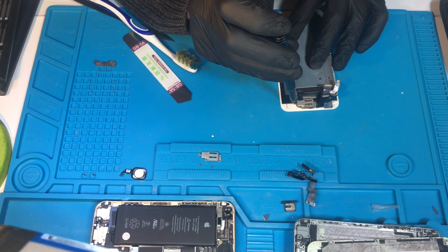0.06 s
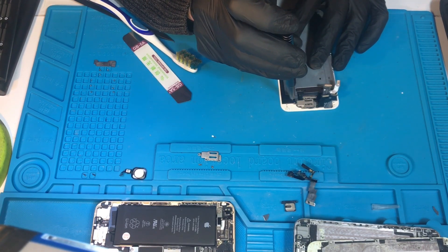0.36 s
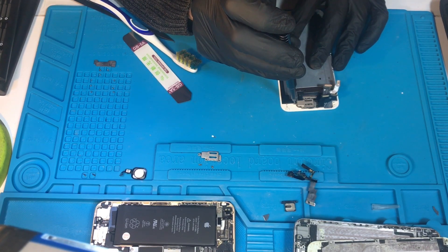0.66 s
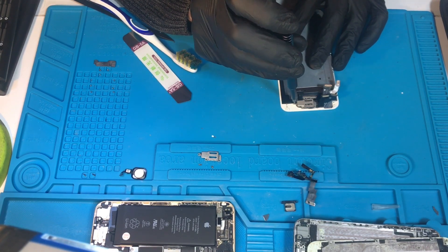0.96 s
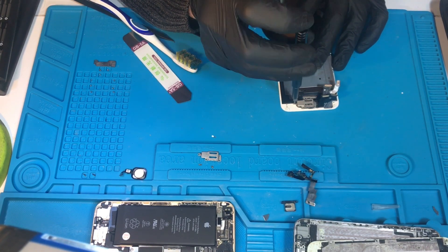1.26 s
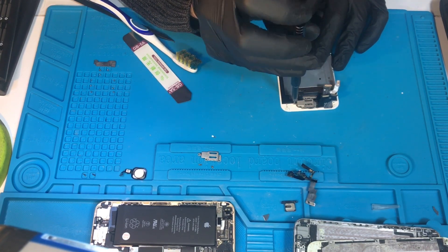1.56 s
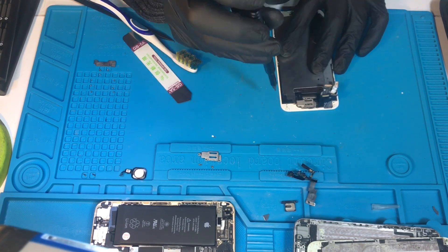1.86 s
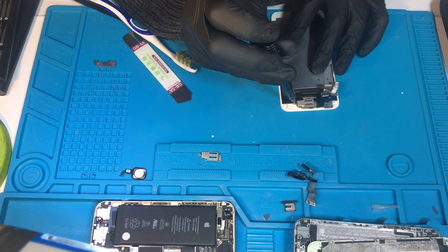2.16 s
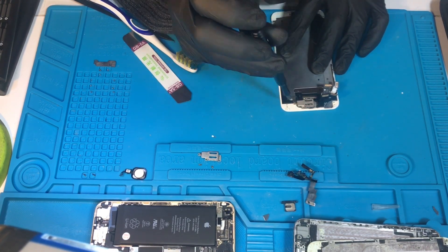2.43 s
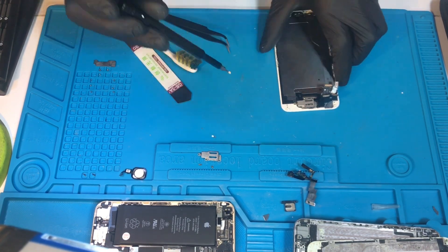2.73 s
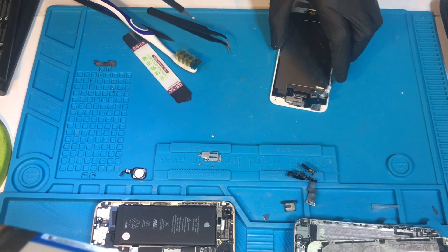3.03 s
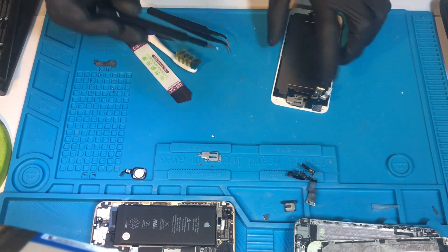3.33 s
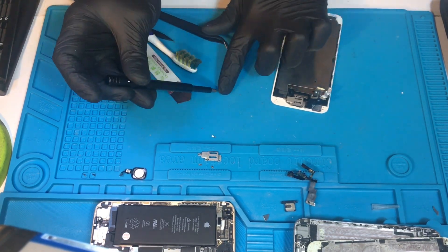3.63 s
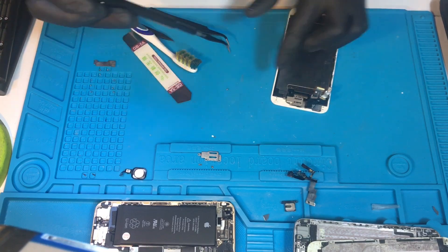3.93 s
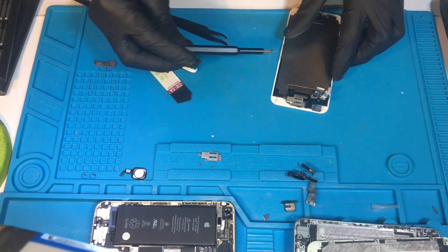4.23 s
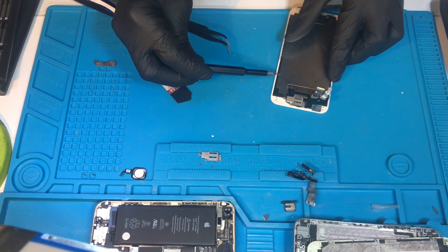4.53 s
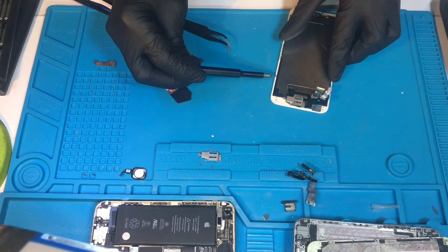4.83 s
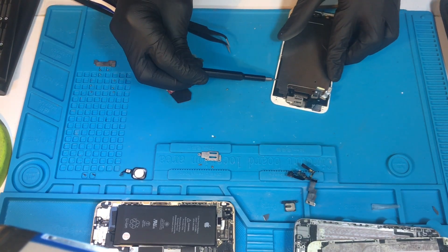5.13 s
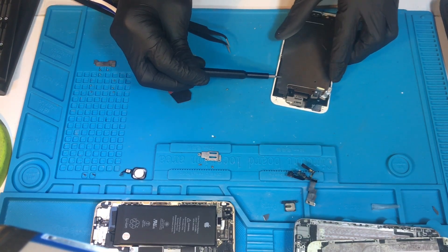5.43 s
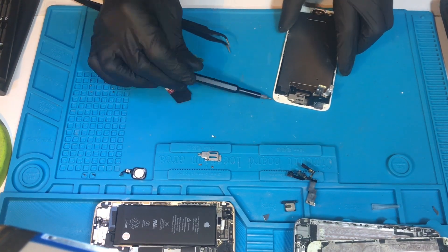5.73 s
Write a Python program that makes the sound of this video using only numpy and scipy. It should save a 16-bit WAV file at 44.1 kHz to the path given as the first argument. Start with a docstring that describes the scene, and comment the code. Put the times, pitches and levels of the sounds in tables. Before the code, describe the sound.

In a quiet small room, steel tweezers lightly tap, click and scrape on an opened phone while gloves rustle faintly. The phone bumps softly and slides briefly on a rubber mat. A small screwdriver gives a few tiny pings in the hand, then hits the workbench with a sharp knock and one quick bounce. A faint low motor hum grows underneath, and the handling sounds close.

```python
"""Quiet room air and rustling gloves are heard first, as steel tweezers click, tap and scrape on an
opened phone. Each contact is a burst of noise coloured by the tool's resonance; taps and soft bumps
also excite the damped modes of the bench. One tap leaves a short noise tail, then the phone slides on
its silicone mat. A small screwdriver pings in the hand, then knocks hard on the bench and bounces.
The small room reverberates, and a low motor hum grows underneath."""
import sys
import numpy as np
from scipy import signal
from scipy.fft import rfft, irfft, next_fast_len
from scipy.io import wavfile
from scipy.ndimage import map_coordinates

SR = 44100
rng = np.random.default_rng(int(sys.argv[2]) if len(sys.argv) > 2 else 0)


def generate_wav(sig):
    """Save sig (samples, or channels by samples) to the path in sys.argv[1] as 16-bit PCM at SR."""
    pcm = np.round(np.clip(np.atleast_2d(sig).T, -1, 1) * 32767).astype(np.int16)
    wavfile.write(sys.argv[1], SR, pcm)


N = 264159


def amp(db):
    """Decibels to gain."""
    return 10 ** (np.asarray(db) / 20)


def unit(x):
    """x at rms 1."""
    return x / np.sqrt(np.mean(x ** 2) + 1e-20)


def along(points, hz):
    """(Hz, value) points read on a log axis."""
    f, v = np.transpose(points)
    return np.interp(np.log(hz + 1), np.log(f + 1), v)


def curve(rows):
    """(s, value) points read at every sample."""
    return np.interp(np.arange(N) / SR, *np.transpose(rows))


def wobble(rate):
    """A smooth random curve, rate knots a second."""
    return map_coordinates(rng.standard_normal(int(N * rate / SR) + 4), [np.arange(N) * rate / SR])


def filtered(x, response):
    """x times a response of frequency."""
    m = next_fast_len(len(x) + SR // 10)
    return irfft(rfft(x, m) * response(np.fft.rfftfreq(m, 1 / SR)), m)[:len(x)]


def resonance(f, centre_hz, width_hz):
    """Response of one damped resonance, 1 at its centre."""
    return 1j * f * width_hz / (centre_hz ** 2 - f * f + 1j * f * width_hz)


def noise(spectrum):
    """Coloured noise of rms 1."""
    return unit(filtered(rng.standard_normal(N), lambda f: amp(along(spectrum, f))))


def fade(t, t60):
    """A decay that loses 60 dB in t60."""
    return np.exp(-np.log(1000) * t / t60)


def add(track, s, sound):
    """Mix a sound into the track at time s."""
    part = track[round(s * SR):][:len(sound)]
    part += sound[:len(part)]


# reverberation of the small room (frequency [Hz], t60 [s])
ROOM = [(150, 0.45), (600, 0.077), (2000, 0.211), (6000, 0.13), (14000, 0.11)]
def in_room(sound, wet_db, delay):
    """The sound and its diffuse echo, in which each frequency dies at its own speed."""
    hz, t, z = signal.stft(rng.standard_normal(len(sound)), SR, nperseg=256)
    tail = signal.istft(z * fade(t, along(ROOM, hz)[:, None]), SR)[1]
    tail = np.pad(tail / np.linalg.norm(tail), (round(delay * SR), 0))
    return sound + amp(wet_db) * signal.fftconvolve(sound, tail)[:len(sound)]


def ringing(modes, t, scatter_db):
    """Damped modes, all pushed the same way by the blow, at slightly new strengths."""
    return sum(amp(db + scatter_db * rng.standard_normal()) * fade(t, t60) * np.sin(2 * np.pi * hz * t)
               for hz, db, t60 in modes)


# envelope of the motor hum (time [s], level [dB])
HUM_ENVELOPE = [(0, -80), (1.25, -76.5), (3.7, -62), (5.3, -59.5), (5.82, -62), (5.99, -71)]
# steady tones in the room (frequency [Hz], level [dB])
ROOM_TONES = [(100, -77.5), (160.5, -70), (199.5, -77), (333.5, -80.5)]
# spectrum of the rumble (frequency [Hz], relative density [dB])
RUMBLE_SPECTRUM = [(25, -47), (50, -17), (75, -0.5), (100, 5), (130, 2.5), (175, 7.5), (230, -11.5),
                   (320, -43), (600, -62)]
# spectrum of the room air (frequency [Hz], relative density [dB])
AIR_SPECTRUM = [(120, -43), (200, -3.5), (298, -4), (333, -3), (940, -12.5), (1170, -13), (1540, -16),
                (1710, -12), (2380, -17), (15500, -38.5)]
def background():
    """Phase modulation: a motor's unsteady speed makes its hum waver over faint tones, rumble and air."""
    t = np.arange(N) / SR
    tone = lambda hz, drift_rad: np.sqrt(2) * np.sin(2 * np.pi * hz * t + drift_rad * wobble(4.19))
    hum = amp(curve(HUM_ENVELOPE)) * tone(hz=112.9, drift_rad=0.38)
    drone = sum(amp(db) * tone(hz, drift_rad=0.5) for hz, db in ROOM_TONES)
    return hum + drone + amp(-69.5) * noise(RUMBLE_SPECTRUM) + amp(-68) * noise(AIR_SPECTRUM)


def swell(t, middle, half_length):
    """Gaussian envelope: a smooth rise and fall around a moment."""
    return np.exp(-((t - middle) / half_length) ** 2)


# spectrum of glove rustle (frequency [Hz], relative density [dB])
GLOVE_SPECTRUM = [(400, -8), (1500, -7), (4000, -2.5), (8000, 0.5), (10500, -2.5), (14000, -1), (16000, -7)]
# hand movements (middle [s], level [dB], half length [s])
HAND_MOVES = [(1.174, -73, 0.18), (2.634, -68.5, 0.14), (3.15, -74.5, 0.61), (4.084, -70.5, 0.2),
              (5.785, -71, 0.41)]
def gloves():
    """Incoherent addition: the rustle of each movement adds in power to that of the resting gloves."""
    t = np.arange(N) / SR
    resting_power = amp(-78) ** 2
    moving_power = sum((amp(db) * swell(t, s, half_length)) ** 2 for s, db, half_length in HAND_MOVES)
    grain = amp(1.02 * wobble(89))
    return np.sqrt(resting_power + moving_power) * grain * noise(GLOVE_SPECTRUM)


# spectrum of steel contact noise (frequency [Hz], relative density [dB])
STEEL_SPECTRUM = [(100, -30), (800, -2), (2500, -2.5), (3700, -2), (4700, 1.5), (7000, 1.5), (9000, 0),
                  (11500, 0.5), (14500, 1.5), (16000, -2.5)]
def contact_noise(size, ring_hz, ring_db, q):
    """Source and filter: the tool's resonance raises a peak in broadband contact noise of rms 1."""
    peak = lambda f: amp(ring_db) * abs(resonance(f, ring_hz, ring_hz / q)) ** 2
    colour = lambda f: amp(along(STEEL_SPECTRUM, f)) * np.hypot(1, peak(f))
    return unit(filtered(rng.standard_normal(size), colour))


def tick(t60, ring_hz, ring_db):
    """Exponential decay: a steel tip catches in a short burst, and the room reverberates."""
    t = np.arange(SR // 4) / SR
    contact = contact_noise(len(t), ring_hz, ring_db, q=6)
    attack = 1 - np.exp(-t / (0.028 * t60))  # longer contacts build up more slowly
    return in_room(contact * attack * fade(t, t60), wet_db=-5.5, delay=0.002)


# steel catching on small parts (time [s], level [dB], t60 [s], resonance [Hz])
STEEL_CLICKS = [(.014, -53, 0.018, 6700), (0.3656, -52.5, .014, 11400), (.396, -55, .016, 6200),
                (.434, -56, .018, 6340), (.440, -51.5, 0.031, 8800), (1.657, -56, 0.014, 6900),
                (1.8119, -39, 0.025, 6450), (1.918, -39, 0.025, 7000), (1.922, -47, 0.039, 3200),
                (2.204, -53.5, 0.015, 10800), (2.214, -53, .022, 6850), (2.77, -52, 0.026, 7050),
                (3.124, -41, 0.023, 13700), (3.626, -54, .012, 10950), (4.478, -50, 0.022, 14500),
                (4.673, -59.5, 0.025, 11100), (4.7108, -56, .01, 13000), (5.7056, -48, 0.017, 11300),
                (5.785, -50, 0.011, 12000)]
def clicks():
    """Transient excitation: a light catch rings the steel without moving the phone."""
    track = np.zeros(N)
    for s, db, t60, ring_hz in STEEL_CLICKS:
        add(track, s, amp(db) * tick(t60, ring_hz, ring_db=8))
    return track


# modes of the bench's short thump (frequency [Hz], relative level [dB], t60 [s])
THUMP_MODES = [(503, 1, 0.011), (689, -12, 0.02), (1360, 4.5, 0.0086), (1726, -1.5, 0.0096),
               (2470, 0.5, 0.0076), (4220, -13.5, 0.0059)]
# ringing modes of the bench and what lies on it (frequency [Hz], relative level [dB], t60 [s])
RING_MODES = [(191, -17.5, 0.063), (335.6, -18, 0.12), (404.2, -21.5, 0.08), (478, -26, 0.12),
              (552, -24, 0.07), (629, -28.5, 0.12), (717, -24, 0.11), (792, -29, 0.18), (903, -40, 0.14),
              (1067, -21, 0.11), (1188, -27, 0.057), (1275, -34, 0.083), (1404, -26, 0.067),
              (1708, -22.5, 0.073), (1810, -40, 0.081), (1970, -23.5, 0.08), (2136, -26.5, 0.13),
              (2310, -26.5, .11), (2480, -47, 0.082), (2815, -30.5, 0.12), (3260, -29, 0.091)]
def knock(cutoff_hz):
    """Modal vibration: a blow thumps and rings the bench; the mat takes the treble from gentle ones."""
    t = np.arange(SR // 4) / SR
    thump = 1.79 * ringing(THUMP_MODES, t, scatter_db=0.5) * (1 - np.exp(-t / 0.0011))
    ring = amp(3) * ringing(RING_MODES, t, scatter_db=1) * (1 - np.exp(-t / 0.00042))
    blow = in_room(thump, wet_db=-13.5, delay=0.00295) + ring
    add(blow, 0.013, amp(-17) * thump)  # reflection from a near wall
    gap_hz, gap_width_hz = 240, 68  # the bench hardly answers between its two lowest modes
    blow = signal.lfilter(*signal.iirnotch(gap_hz, gap_hz / gap_width_hz, fs=SR), blow)
    cushion = signal.butter(4, min(cutoff_hz, SR / 4), fs=SR, output="sos")
    radiation = signal.butter(3, 140, "high", fs=SR, output="sos")  # little deep bass is radiated
    return signal.sosfilt(radiation, signal.sosfilt(cushion, blow))


# tweezer tips landing on the phone (time [s], tick gain [dB], knock gain [dB])
TWEEZER_TAPS = [(.1945, -46.5, -43), (0.3226, -58, -47.5), (.343, -42, -45.5), (0.6844, -42.5, -40),
                (.784, -54.5, -48), (0.9284, -36, -34.5), (1.4728, -42.5, -41), (1.9227, -47, -51)]
def taps():
    """Structure-borne sound: a tip ticks, and its push passes through the phone into the bench."""
    track, bench_lag_s = np.zeros(N), 0.00044
    for s, tick_db, knock_db in TWEEZER_TAPS:
        add(track, s, amp(tick_db) * tick(t60=0.0059, ring_hz=5900, ring_db=8))
        add(track, s + bench_lag_s, amp(knock_db) * knock(cutoff_hz=827))
    return track


# hands and phone bumping on the mat (time [s], gain [dB], cutoff [Hz])
MAT_BUMPS = [(.369, -34, 260), (2.665, -42, 390), (2.759, -43, 477), (2.794, -43.5, 395), (3.122, -43, 450),
             (3.251, -44.5, 400), (3.699, -45.5, 453), (5.7055, -29.5, 550), (5.914, -42.5, 453)]
def bumps():
    """Cushioned impact: a soft blow excites mainly the low modes of the bench."""
    track = np.zeros(N)
    for s, db, cutoff_hz in MAT_BUMPS:
        add(track, s, amp(db) * knock(cutoff_hz))
    return track


# a tip or glove dragging over an edge (middle [s], level [dB], half length [s], resonance [Hz])
EDGE_DRAGS = [(1.063, -71.5, .03, 9900), (1.335, -69, 0.023, 13400), (1.4, -63.5, .016, 9400),
              (1.472, -64, 0.031, 13000), (1.546, -61, .022, 8550), (1.805, -60.5, 0.022, 11100),
              (2.779, -71.5, 0.047, 7000), (3.357, -65.5, 0.025, 8000), (3.941, -64.5, 0.022, 10300),
              (4.031, -67, 0.021, 9000), (4.207, -66.5, 0.013, 8800), (5.62, -69.5, 0.027, 12000)]
def scrapes():
    """Stick-slip friction: short drags swell and fade, their level flickering on the way."""
    track, t = np.zeros(N), np.arange(SR // 2) / SR
    middle = t.mean()
    for s, db, half_length, ring_hz in EDGE_DRAGS:
        friction = contact_noise(len(t), ring_hz, ring_db=3.5, q=1.85)
        add(track, s - middle, amp(db) * swell(t, middle, half_length) * friction)
    return track * amp(3.7 * wobble(350))


# the tweezers' short noise tail after a tap, then the phone rubbing the mat near 3 s
# (time [s], gain [dB], band centre [Hz])
TAIL_AND_RUBS = [(1.93, -64, 2300), (2.981, -55.5, 905), (3.02, -65, 1260), (3.11, -69, 1940)]
def tweezer_tail_and_slide():
    """Band-limited noise, quick to rise and slow to decay: the tweezers' tail, then the phone's slide."""
    track, t = np.zeros(N), np.arange(SR // 2) / SR
    envelope = (1 - np.exp(-t / 0.019)) * fade(t, t60=0.26)
    for s, db, centre_hz in TAIL_AND_RUBS:
        band = lambda f: resonance(f, centre_hz, width_hz=690) ** 2
        band_noise = unit(filtered(rng.standard_normal(len(t)), band))
        add(track, s, amp(db) * envelope * band_noise)
    return track * amp(2.4 * wobble(60))


# fingers turning the screwdriver (time [s], level [dB])
SHAFT_PINGS = [(4.603, -49), (5.0672, -51), (5.164, -58), (5.444, -62.5), (5.522, -56.5)]
def screwdriver_pings():
    """Resonance: the shaft answers each touch at the same natural frequency."""
    track = np.zeros(N)
    for s, db in SHAFT_PINGS:
        add(track, s, amp(db) * tick(t60=0.013, ring_hz=4380, ring_db=19))
    return track


# the screwdriver hitting the bench and bouncing once
# (time [s], crack gain [dB], steel resonance gain [dB], knock lag [s], knock gain [dB], cutoff [Hz])
BENCH_STRIKES = [(5.7965, -15.5, 4, .0002, -13, 5030), (5.8247, -19, 14, 0.00136, -27.5, 2900)]
def screwdriver_strikes():
    """Hard impact: a crack of steel, a knock of the bench and a rattle of loose parts in proportion."""
    track = np.zeros(N)
    for s, crack_db, ring_db, lag_s, knock_db, cutoff_hz in BENCH_STRIKES:
        add(track, s, amp(crack_db) * tick(t60=0.0037, ring_hz=10760, ring_db=ring_db))
        rattle = amp(-22.5) * tick(t60=0.048, ring_hz=5330, ring_db=5)
        add(track, s + lag_s, amp(knock_db) * (knock(cutoff_hz) + rattle))
    return track


def scene():
    """Superposition: all sources add in one channel."""
    handling = gloves() + clicks() + taps() + bumps() + scrapes() + tweezer_tail_and_slide()
    return (background() + handling + screwdriver_pings() + screwdriver_strikes())[None]


def record(dry):
    """Band limiting: an ideal low-pass filter removes the highest treble."""
    return filtered(dry[0], lambda hz: hz < 15950)[None]


dry = scene()
out = record(dry)
generate_wav(out)
```